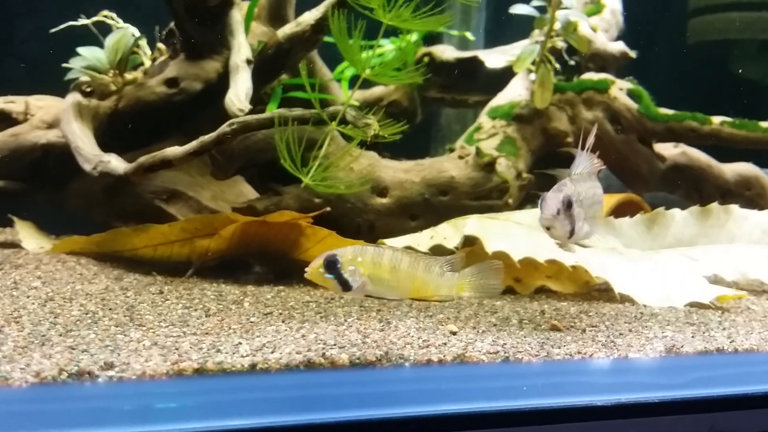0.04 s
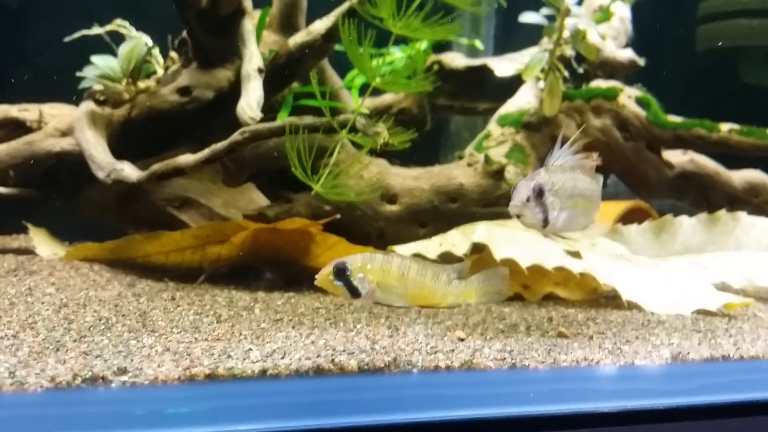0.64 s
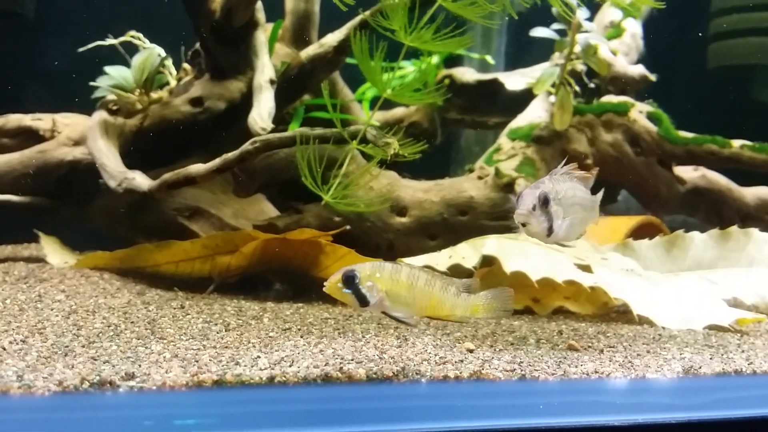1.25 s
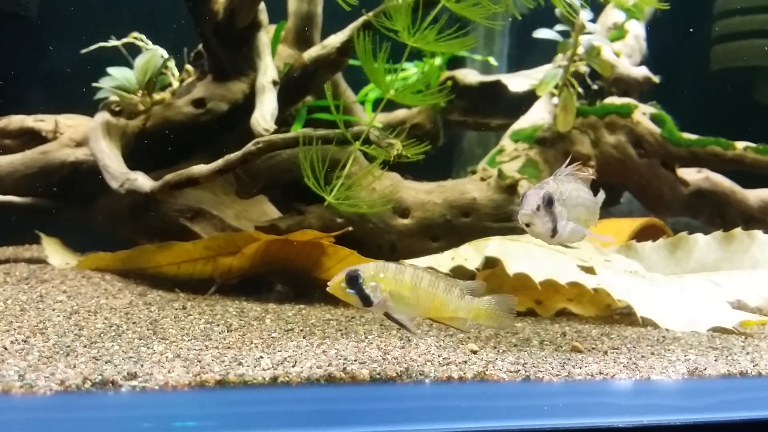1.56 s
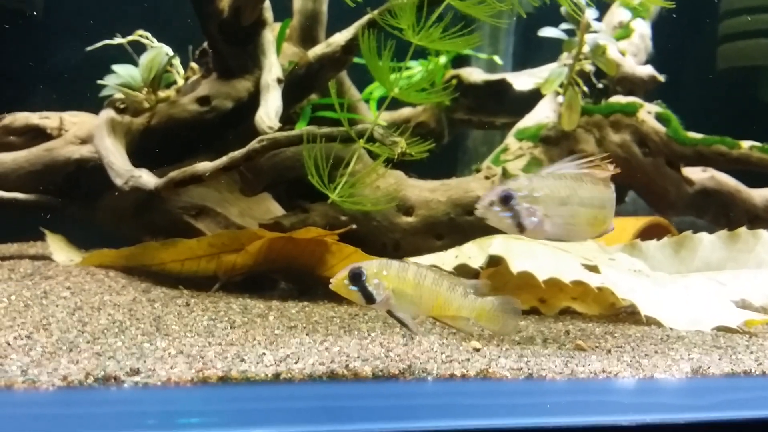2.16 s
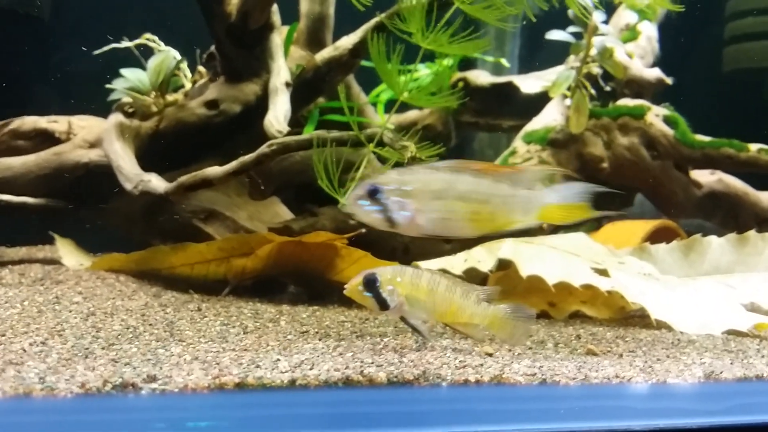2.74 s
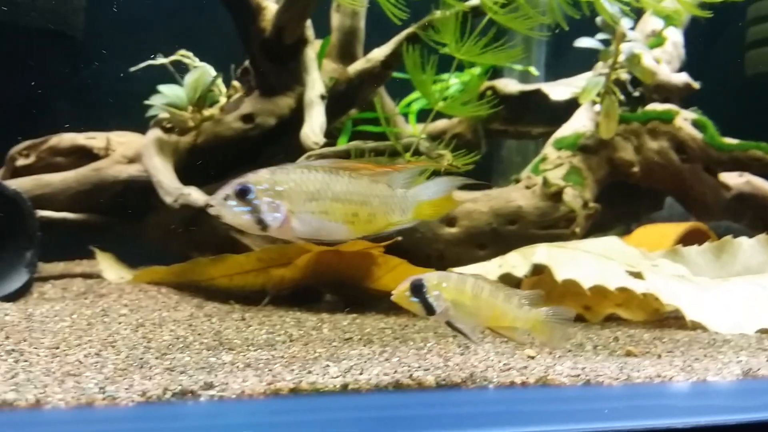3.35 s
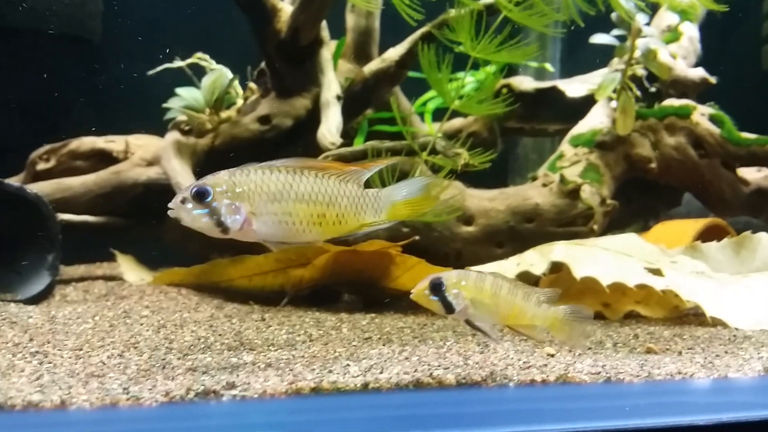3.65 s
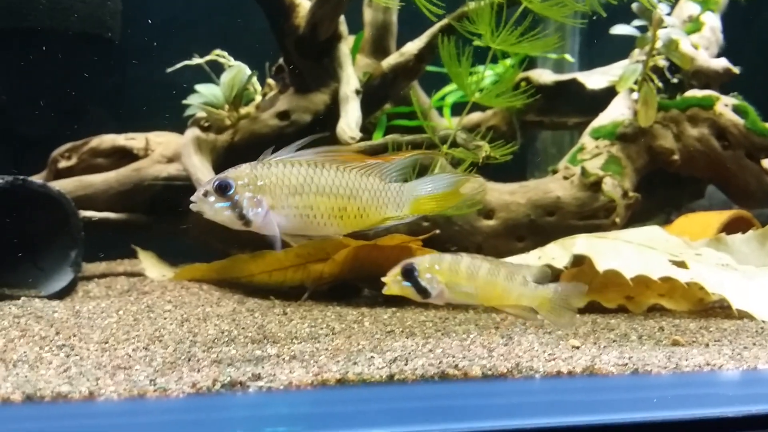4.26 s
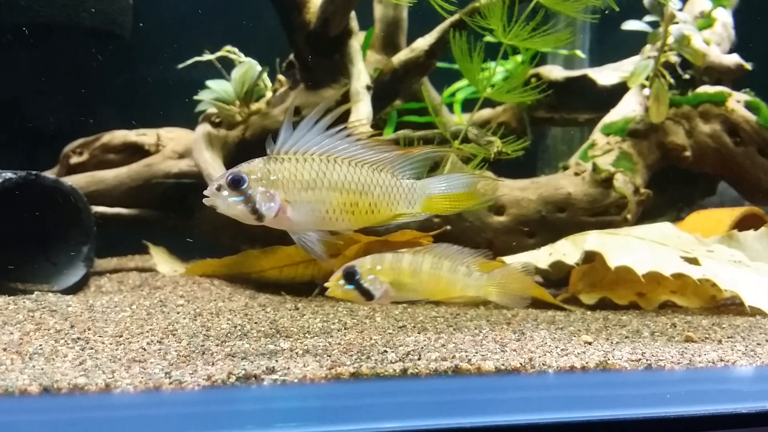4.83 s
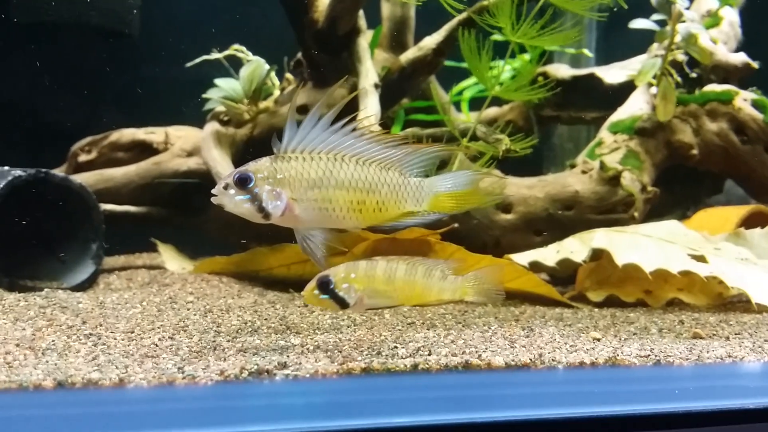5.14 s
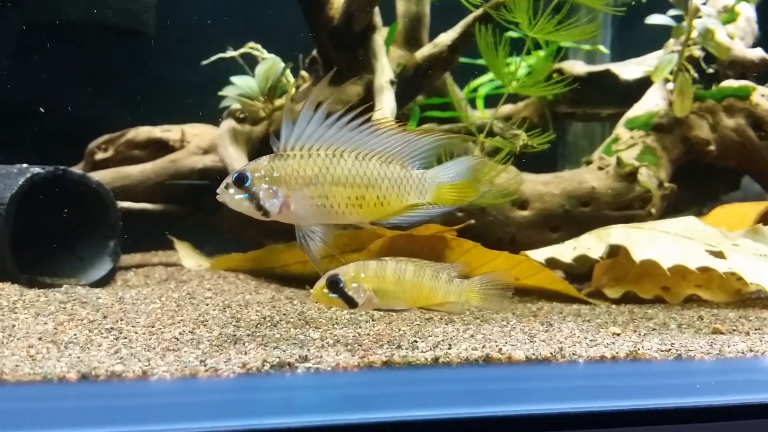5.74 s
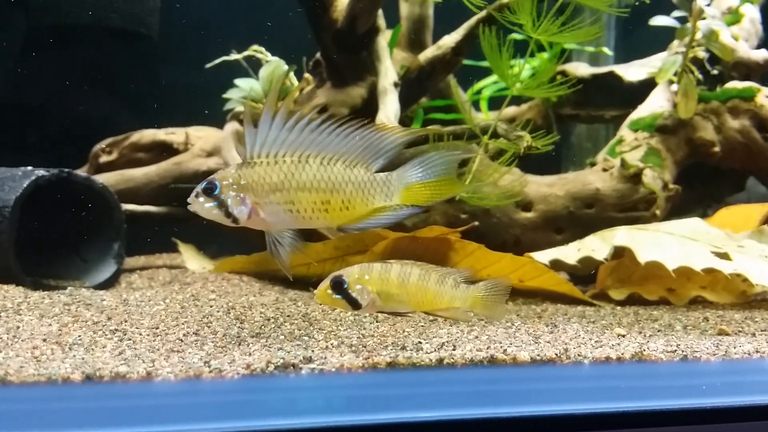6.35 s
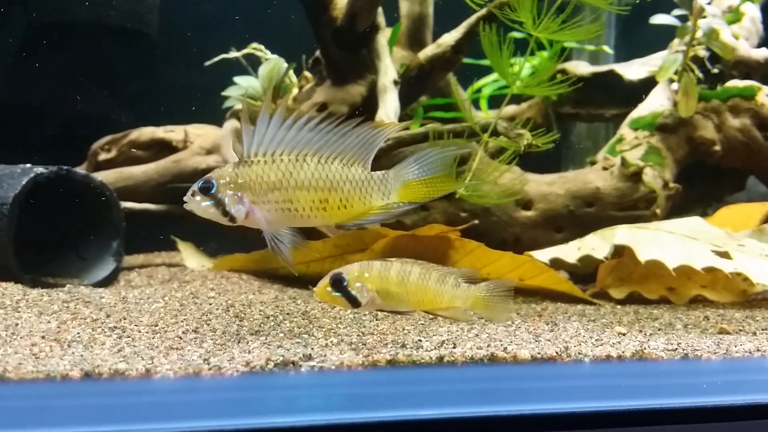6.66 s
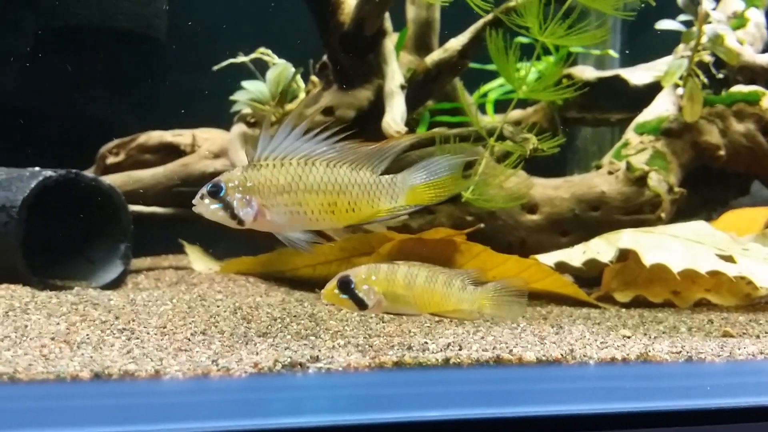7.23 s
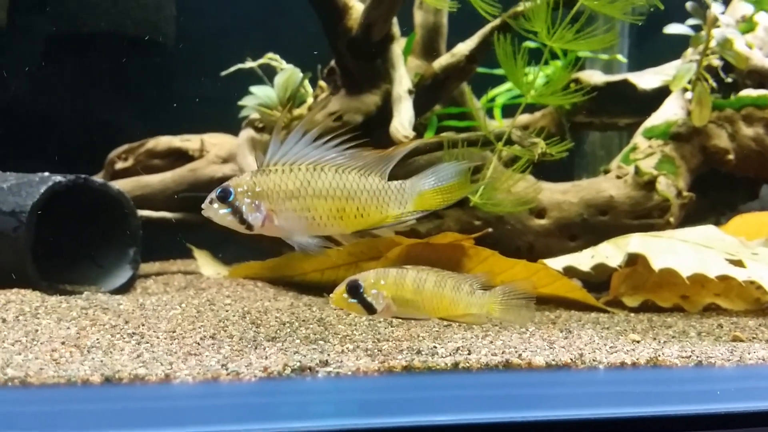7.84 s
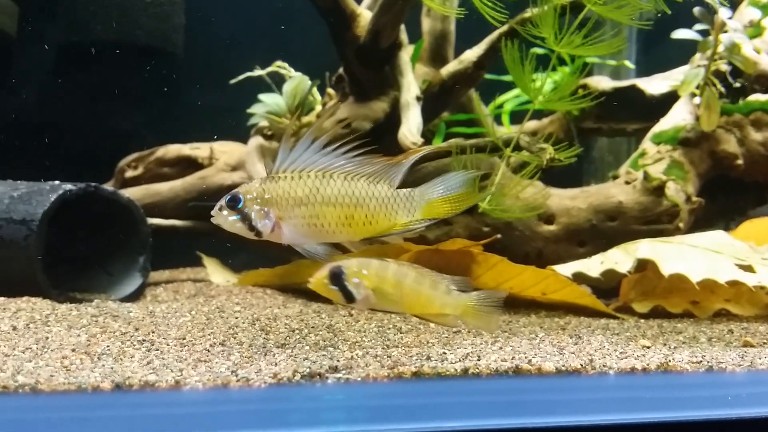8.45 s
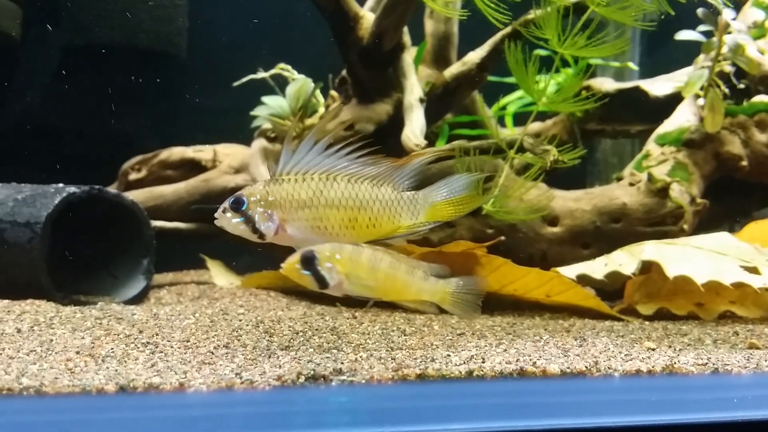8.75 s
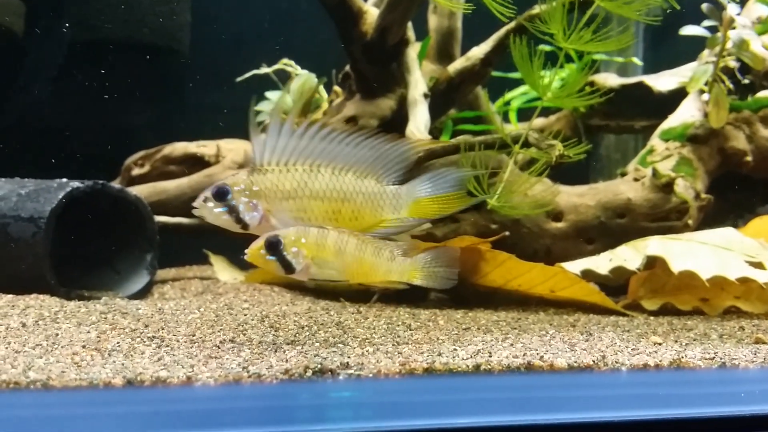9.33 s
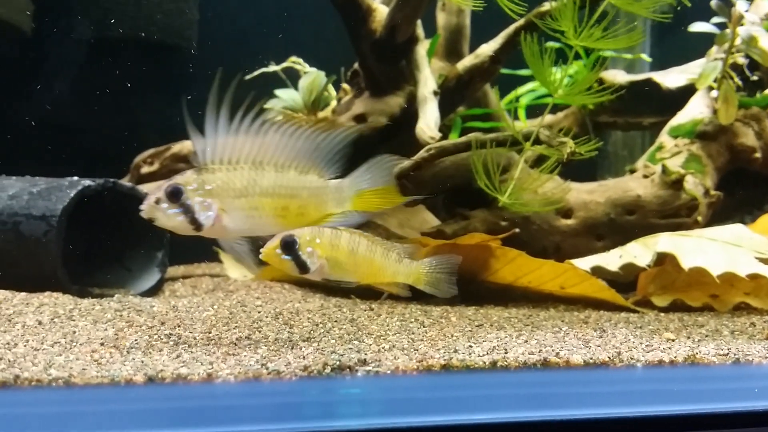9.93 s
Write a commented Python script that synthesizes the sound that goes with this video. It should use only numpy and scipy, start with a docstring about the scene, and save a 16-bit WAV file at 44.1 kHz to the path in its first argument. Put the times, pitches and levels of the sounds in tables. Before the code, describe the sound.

An aquarium pump hums steadily for the whole ten seconds, heard close up on a hand-held stereo microphone indoors. The filter churns softly and water trickles with a fine fizz, stronger on the right. Small bubbles burst irregularly with short, bright clicks, clearest around 3.8, 4.1, 6, 7.2 and 7.8 seconds, among tiny ticks of spray and a few soft gurgles. At 1.5 seconds a finger bumps the right microphone with a sharp pop, by far the loudest sound. Near 2.8 seconds the right side briefly turns duller, clears again, then gradually loses brightness from about 4.3 seconds. Faint rubs and scuffs of the hand come now and then, with soft bumps near 3, 5 and 7.3 seconds. Two quick handling knocks land at about 9.6 and 9.7 seconds as the hum and trickle continue.

```python
"""Close to an aquarium, on the stereo microphones of a hand-held camera. From the start the pump hums,
the filter churns and water trickles, with small bubbles bursting mostly to the right. A finger shifts
over the right microphone port and bumps it with a sharp pop at 1.5 s. Near 2.8 s it covers the port
and dulls that side, then slips off; from 4.3 s it creeps back. The hand rubs and bumps the camera
now and then, ending on two knocks just before 10 s."""
import sys
import numpy as np
from scipy import signal
from scipy.fft import rfft, irfft, next_fast_len
from scipy.io import wavfile

SR = 44100
rng = np.random.default_rng(int(sys.argv[2]) if len(sys.argv) > 2 else 0)


def transcribe(signal):
    """Save signal, clipped to [-1, 1], as a 16-bit WAV file at the path in sys.argv[1]."""
    frames = np.atleast_2d(signal).T
    limited = np.clip(frames, -1, 1)
    pcm = np.round(limited * 32767).astype(np.int16)
    wavfile.write(sys.argv[1], SR, pcm)


N = 440559
TIME = np.arange(N) / SR
LEFT_DB = -5.5  # the tank is fainter at the left microphone


# strong partials of the pump: multiple of the mains, left level/dB, right level/dB
PUMP_PARTIALS = [(2, -68.4, -67.8), (3, -65.8, -60.1), (4, -55.6, -53.4), (5, -53.9, -52.2),
                 (6, -48.0, -44.7), (7, -51.7, -49.8), (8, -55.6, -51.1), (9, -63.6, -65.7),
                 (10, -68.7, -59.2), (11, -59.3, -48.5), (12, -57.5, -61.6), (13, -68.8, -76.2),
                 (14, -66.6, -72.5), (15, -68.5, -65.5), (16, -70.4, -64.6), (17, -61.9, -55.1),
                 (18, -79.1, -56.0), (25, -78.3, -66.8), (26, -81.0, -66.3), (29, -64.2, -63.9),
                 (30, -72.6, -66.6), (34, -76.5, -64.5), (35, -69.7, -62.6), (37, -80.8, -71.5),
                 (39, -76.7, -71.2), (41, -77.2, -65.9), (48, -77.1, -70.2), (52, -81.7, -69.7)]
# outline of its weaker partials: f/Hz, level/dB
PUMP_BUZZ = [(60, -63), (1140, -80.5), (1400, -64.5), (1700, -83), (2400, -76), (2750, -81.5),
             (4200, -78.5), (5500, -93), (7000, -81), (8000, -104)]

def pump(mains_hz=60.02, scatter_hz=800, uneven_db=1.5, waver=0.0081, lead_s=.00008):
    """The motor kicks once a mains cycle; the housing smears each kick into a steady hum."""
    order = np.arange(1, 134)
    hz = order * mains_hz
    level_db = read(PUMP_BUZZ, hz) + uneven_db * rng.standard_normal((2, len(hz))) + [[LEFT_DB], [0]]
    for multiple, left_db, right_db in PUMP_PARTIALS:
        level_db[:, round(multiple) - 1] = left_db, right_db
    # higher partials travel longer, and a housing resonance holds back those around it
    lag = np.pi * .22 * order ** 2 + 2 * np.arctan((hz - 330) / 20)
    # a standing wave puts a node between the two microphones
    node = np.pi * (abs(hz - 570) < 50) * np.array([[1], [0]])
    # short waves reach them by unrelated paths
    scatter = np.minimum((hz / scatter_hz) ** 4, np.pi) * rng.standard_normal((2, len(hz)))
    lead = 2 * np.pi * hz * np.array([[lead_s], [0]])
    partials = np.sqrt(2) * amp(level_db) * np.exp(1j * (node + scatter + lead - lag))
    grid = np.linspace(0, 1, 4096)
    cycles = (partials @ np.exp(2j * np.pi * order[:, None] * grid)).real
    turns = mains_hz * TIME + 0.0011 * drift(rate_hz=7.0)
    hum = np.array([np.interp(turns % 1, grid, cycle) for cycle in cycles])
    return hum * (1 + waver * drift(rate_hz=21))


# loudest bursts at the surface: t/s, level/dB before gain and pan, f/Hz, snap against ring/dB
LOUD_BURSTS = [(0.316, -43, 4000, -1), (0.454, -41, 2280, 0), (0.5013, -38.5, 4250, 0),
               (0.915, -42, 2910, 4), (3.168, -41, 2420, -8), (3.7686, -33.5, 2230, -1),
               (3.871, -38.5, 2370, 4), (4.0737, -33.5, 4140, -3), (4.3557, -39, 1980, 1),
               (4.91, -39, 2350, 3), (5.173, -37, 2340, -3), (5.803, -39, 4700, -3),
               (5.9934, -34.5, 2620, 7), (6.1903, -40.5, 4050, -3), (6.638, -42.5, 2380, -5),
               (6.876, -41, 2950, -8), (7.0615, -38.5, 2670, 2), (7.2383, -32.5, 3720, 1),
               (7.476, -39, 4850, -2), (7.8447, -34, 2580, 5.5), (8.964, -39, 5540, 0),
               (9.2399, -41.5, 2270, -5), (9.597, -38.5, 2620, 3), (9.614, -38, 4350, -3),
               (9.6878, -41, 3950, -2)]
# loudest ticks of spray on the lid: t/s, level/dB, f/Hz
LID_SPRAY = [(0.167, -41, 9500), (1.785, -36, 11700), (2.392, -37, 11300), (4.4682, -43, 7670),
             (5.1133, -39.5, 10100), (5.8117, -41, 9300), (5.9757, -36, 11700), (6.0601, -45, 7760)]
# larger, soft gurgles: t/s, level/dB, f/Hz
SOFT_GURGLES = [(0.851, -42, 710), (1.668, -41, 986), (1.824, -41, 707), (4.605, -40, 1270),
                (4.896, -44, 1280), (6.17, -42, 740)]

def bubbles(burst_gain_db=2.5):
    """Single bursts, ticks of spray and gurgles ring out above the trickle."""
    out = np.zeros((2, N))
    for s, db, hz, snap_db in LOUD_BURSTS:
        add(out, s, burst(burst_gain_db + db, hz, snap_db))
    for s, db, hz in LID_SPRAY:
        tick = snap(ping(hz, cycles=4.8, glide=0.066), snap_hz=11600, snap_db=-1.5)
        add(out, s, in_tank(tick) * amp(db) * amp([[LEFT_DB / 2], [0]]))
    for s, db, hz in SOFT_GURGLES:
        gurgle = ping(hz, cycles=10.5, glide=0.027)
        add(out, s, in_tank(gurgle) * amp(db) * amp([[LEFT_DB], [0]]))
    return out


def soft_bubbles(top_db=-41.5, range_db=5, low_hz=2400, high_hz=3700, count=30):
    """Softer bubbles burst at random, a few each second, favouring the lower pitches."""
    out = np.zeros((2, N))
    for turn, (when, softness, pitch) in enumerate(rng.random((count, 3))):
        hz = low_hz * (high_hz / low_hz) ** (pitch ** 2)
        add(out, (turn + when) / count * N / SR, burst(top_db - range_db * softness, hz, snap_db=-3))
    return out


def burst(db, hz, snap_db, middling_hz=2700, film_hz=3420, pan_db=7, wall_s=.0068, wall_db=-8.5):
    """A bubble bursts at the outflow, on the right; smaller ones ring more cycles and snap higher."""
    smallness = hz / middling_hz
    ring = ping(hz, cycles=4 * smallness ** .3, glide=0.078)
    sound = snap(ring, snap_hz=film_hz * smallness ** 0.26, snap_db=snap_db)
    add(sound, wall_s, amp(wall_db) * sound)  # echo off the far glass wall
    return in_tank(sound) * amp(db + np.array([[-pan_db], [pan_db]]) / 2)


def ping(hz, cycles, glide):
    """A ringing bubble of peak one; its pitch climbs by glide as it reaches the surface."""
    t = np.arange(SR // 16) / SR
    age = hz * t / cycles
    turns = hz * np.cumsum(1 + glide * (1 - np.exp(-age))) / SR
    ring = np.sin(2 * np.pi * turns) * np.exp(-age) * (1 - np.exp(-4 * age))
    return ring / abs(ring).max()


def snap(ring, snap_hz, snap_db):
    """A bubble's film tears with a broad click just as it starts to ring."""
    return ring + amp(snap_db) * ping(snap_hz, cycles=1.7, glide=0)


# strength of the flow: t/s, level/dB
FLOW_LEVEL = [(0, 0), (1.6, -.5), (2.8, -0.5), (3.8, 0.05), (6, 0.5), (7.5, 0), (8.6, 0), (10, 1)]
# trickle at the surface: f/Hz, level/dB per Hz
TRICKLE_SPECTRUM = [(200, -102), (700, -84.5), (1030, -83), (1190, -93), (1450, -86.5), (2400, -85.5),
                    (3000, -87.5), (4000, -90), (5000, -93.5), (7000, -99.5), (9000, -100), (11000, -93),
                    (15000, -91)]
# water churning in the filter housing: f/Hz, level/dB per Hz
CHURN_SPECTRUM = [(20, -99), (40, -90), (90, -82), (150, -80), (300, -78), (335, -79), (362, -69),
                  (400, -80.5), (470, -86), (800, -90.5), (1500, -90), (4000, -115)]

def water(flicker_db=0.9):
    """The filter churns and its outflow trickles, mostly into the right microphone."""
    flow_db = np.interp(TIME, *np.transpose(FLOW_LEVEL)) + flicker_db * drift(rate_hz=33)
    surface = noise(TRICKLE_SPECTRUM, likeness=0.019) + fizz() + crackle()
    churn = noise(CHURN_SPECTRUM, likeness=0.88)
    return (surface * amp(flow_db) + churn) * amp([[LEFT_DB], [0]])


def fizz(per_s=160, base_db=-55, spread_db=4.5, db_per_octave=-5, pitches=28):
    """A crowd of tiny bubbles rings, loudest near 2800 Hz and fainter to either side."""
    out = np.zeros((2, N))
    for hz in np.geomspace(1400, 12000, pitches):
        gaps, strengths = -np.log(rng.random((400, 2))).T
        times = np.cumsum(gaps) * pitches / per_s
        levels_db = base_db + spread_db * np.minimum(strengths, np.e)
        gains = amp(levels_db + db_per_octave * abs(np.log2(hz / 2800)))
        ring = in_tank(ping(hz, cycles=2.9, glide=0.06))
        for s, gain in zip(times[times < N / SR], gains):
            add(out, s, gain * ring)
    return out


def crackle(base_db=-46, spread_db=1.0, tilt_db=11, count=130):
    """Droplets tick faintly at random, the brighter ones louder."""
    out = np.zeros((2, N))
    for when, chance, brightness in rng.random((count, 3)):
        db = base_db + spread_db * min(-np.log(chance), 3) + tilt_db * brightness
        tick = ping(8000 * 1.8 ** brightness, cycles=1.3, glide=0)
        add(out, when * N / SR, amp(db) * in_tank(tick))
    return out


# finger bumps on the right port: t/s, level/dB, rise/s
FINGER_BUMPS = [(1.4710, -4, 0.0002), (1.697, -38, 0.0026), (2.979, -35, 0.0018), (5.032, -35, 0.0034),
                (7.222, -41, .002), (7.253, -32.5, 0.0015), (9.603, -26, 0.00065), (9.69, -24.5, 0.00048)]

def bumps(low_cut_hz=92, leak_db=-38, jolt=.45):
    """A bump is a step of pressure, which the microphone's low cut turns into a pop."""
    out = np.zeros((2, N))
    t = np.arange(SR // 10) / SR
    low_cut = signal.butter(2, low_cut_hz, "high", fs=SR)
    for s, db, rise in FINGER_BUMPS:
        step = jolt + np.minimum(t / rise, 1)  # a jolt at first touch, then the squeeze
        pop = signal.lfilter(*low_cut, step)
        add(out, s, pop / pop.max() * amp(db) * amp([[leak_db], [0]]))
    return out


# dull rumbles of the hand on the camera: t/s, length/s, level/dB
HAND_RUMBLES = [(0.08, 0.24, -56), (0.55, 0.32, -58), (2.55, .2, -55), (4.26, 0.24, -52)]
# scuffs of skin on the camera: t/s, length/s, level/dB
SKIN_SCUFFS = [(0.9, 0.035, -51), (2.089, 0.012, -44), (3.445, 0.055, -49.5), (3.866, 0.022, -48),
               (4.254, 0.051, -44.5), (4.38, 0.14, -56)]

def hand(rumble_hz=108, left_db=-5, scuff_band_hz=(1800, 9000)):
    """The hand rubs the case, right by the microphones: dull rumbles and short, grainy scuffs."""
    out = np.zeros((2, N))
    case = signal.butter(2, [rumble_hz / 1.12, rumble_hz * 1.38], "band", fs=SR)
    for s, length, db in HAND_RUMBLES:
        rub = signal.lfilter(*case, rng.standard_normal(SR))[SR // 10:][:int(length * SR)]
        fade = signal.windows.tukey(len(rub), .5)
        add(out, s, unit_rms(rub) * fade * amp(db) * amp([[left_db], [0]]))
    skin = signal.butter(1, scuff_band_hz, "band", fs=SR)
    for s, length, db in SKIN_SCUFFS:
        slips = rng.standard_normal((2, SR // 4)) * (rng.random(SR // 4) < .15)
        scuff = signal.lfilter(*skin, slips)[:, :int(length * SR)]
        fade = signal.windows.tukey(scuff.shape[1], .6)
        add(out, s, unit_rms(scuff) * fade * amp(db) * amp([[left_db / 2], [0]]))
    return out


# right port's resonance, sinking under the finger in two short slips and a slow creep: t/s, f/Hz
RIGHT_PORT_TUNING = [(0, 7100), (0.95, 7200), (1.4, 5800), (2.05, 7100), (2.4, 6300), (2.75, 3800),
                     (3.45, 6360), (4.3, 6760), (5.05, 6050), (6.2, 4750), (7.4, 4060), (9.5, 4140),
                     (9.7, 4700)]

def ports(dry, left_hz=6920, left_q=9.4, open_q=2.95):
    """Each microphone listens through a port; the finger dulls the right one."""
    hz, t, (left, right) = signal.stft(dry, SR, nperseg=512)
    right_hz = np.interp(t, *np.transpose(RIGHT_PORT_TUNING))
    right_q = open_q * (right_hz / left_hz) ** 2  # the finger also damps the resonance
    left = left * air_plug(hz[:, None], left_hz, left_q)
    right = right * air_plug(hz[:, None], right_hz, right_q)
    return signal.istft(np.array([left, right]), SR)[1][:, :N]


def air_plug(hz, tuned_hz, q):
    """The air in a microphone port acts as a resonant low-pass."""
    return 1 / (1 - (hz / tuned_hz) ** 2 + 1j * hz / (tuned_hz * q))


def in_tank(sound):
    """A short sound reaches each microphone by its own path, scaled to a peak of one."""
    pair = np.array([signal.fftconvolve(sound, echoes()) for _ in range(2)])
    return pair / abs(pair).max(1, keepdims=True)


def echoes(glass_db=6, glass_t60=.035, room_db=2, room_t60=.17):
    """One path to a microphone: direct sound, quick echoes between the glass walls, then the room."""
    t = np.arange(SR // 4) / SR
    path = signal.unit_impulse(len(t))
    for db, t60 in (glass_db, glass_t60), (room_db, room_t60):
        tail = rng.standard_normal(len(t)) * np.exp(-np.log(1000) * t / t60)
        energy = SR * t60 / np.log(1e6)
        path += amp(db) * tail / np.sqrt(energy)
    return path


def noise(spectrum, likeness):
    """Two partly alike channels of noise with a spectrum in dB per Hz."""
    size = next_fast_len(N, True)
    right, other = rng.standard_normal((2, size))
    left = likeness * right + np.sqrt(1 - likeness ** 2) * other
    gain = amp(read(spectrum, np.fft.rfftfreq(size, 1 / SR))) * np.sqrt(SR / 2)
    return irfft(rfft([left, right]) * gain, size)[:, :N]


def drift(rate_hz):
    """A slow random wander with an rms of one."""
    hz = np.fft.rfftfreq(N, 1 / SR)
    return unit_rms(irfft(rfft(rng.standard_normal(N)) * np.exp(-(hz / rate_hz) ** 2), N))


def amp(db):
    """Decibels to gain."""
    return 10 ** (np.asarray(db) / 20)


def unit_rms(x):
    """Scales to an rms of one."""
    return x / np.sqrt(np.mean(x ** 2) + 1e-20)


def read(points, hz):
    """Reads a spectrum on a log-frequency axis."""
    f, value = np.transpose(points)
    return np.interp(np.log(hz + 1), np.log(f), value)


def add(mix, s, sound):
    """Mixes a sound in at s seconds."""
    part = mix[..., max(round(s * SR), 0):][..., :sound.shape[-1]]
    part += sound[..., :part.shape[-1]]


def scene():
    """Pump, water and bubbles, close to the tank."""
    return pump() + water() + bubbles() + soft_bubbles()


def record(dry, hiss_db=-61.5, edge_hz=15350):
    """The hand-held camera: two ports, handling noise, the microphones' own hiss and a band limit."""
    heard = ports(dry) + bumps() + hand() + amp(hiss_db) * rng.standard_normal((2, N))
    band_limit = signal.firwin(255, edge_hz, window=("kaiser", 9), fs=SR)
    return signal.oaconvolve(heard, band_limit[None], "same")


dry = scene()
out = record(dry)
transcribe(out)
```